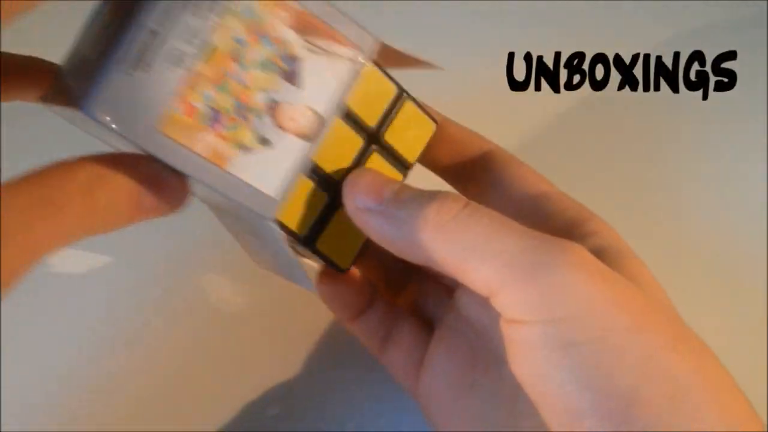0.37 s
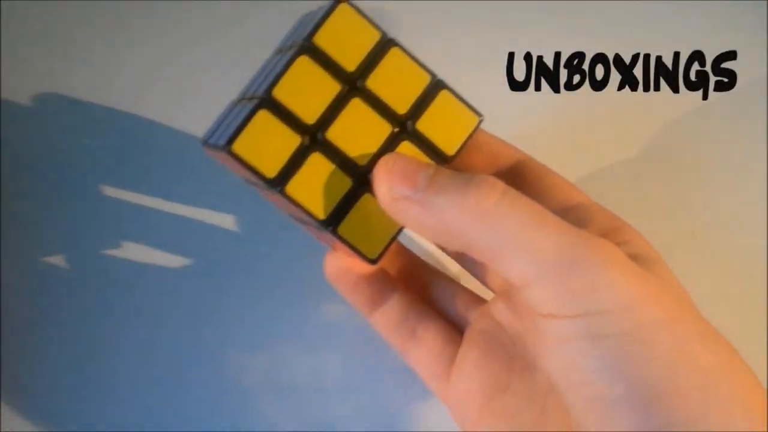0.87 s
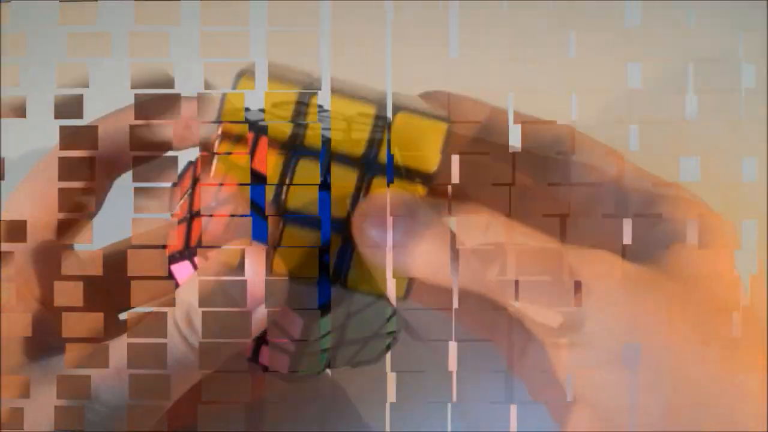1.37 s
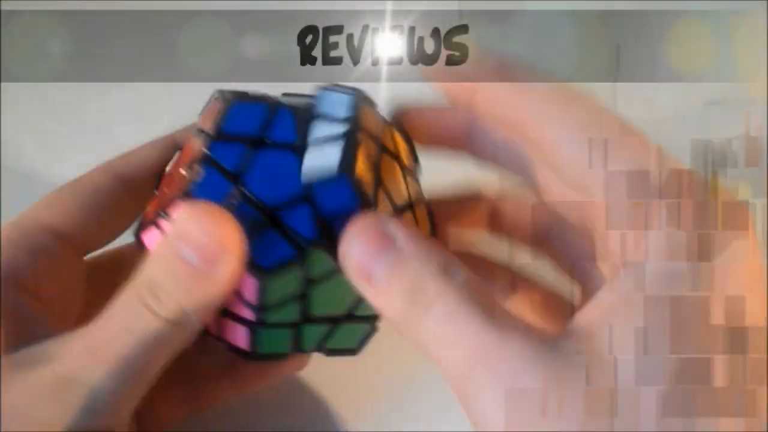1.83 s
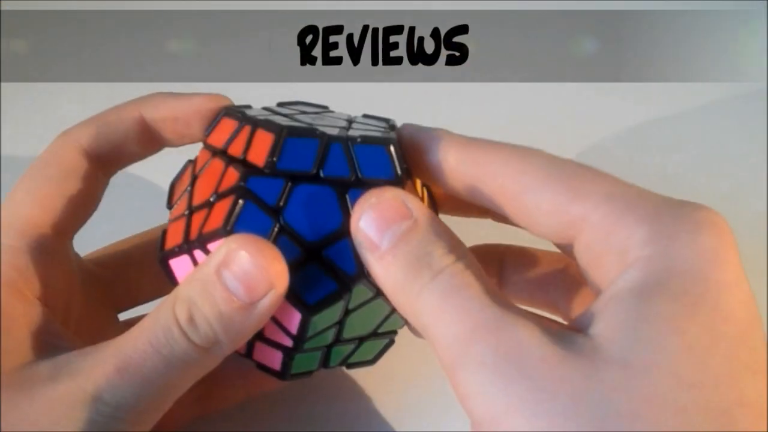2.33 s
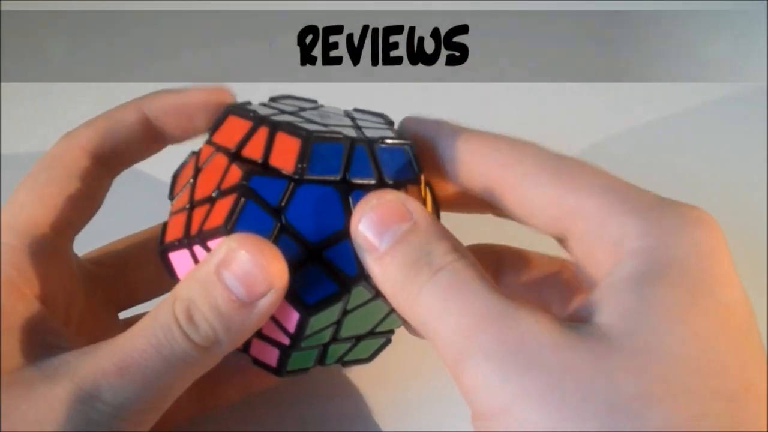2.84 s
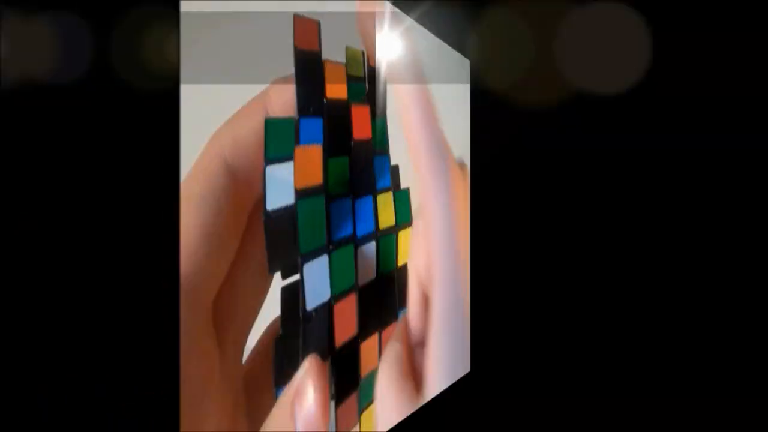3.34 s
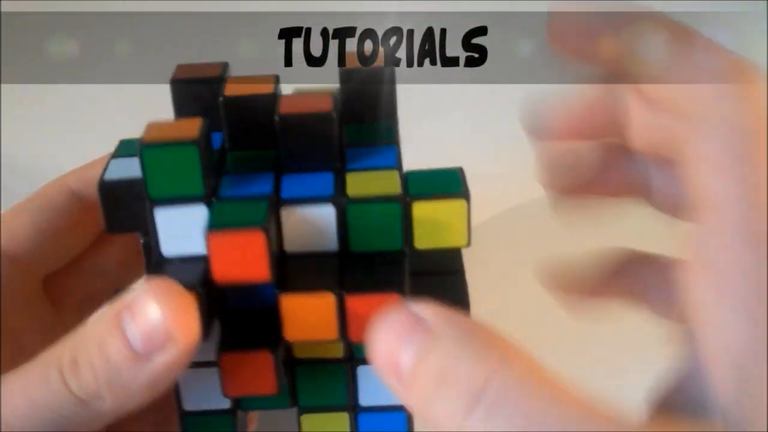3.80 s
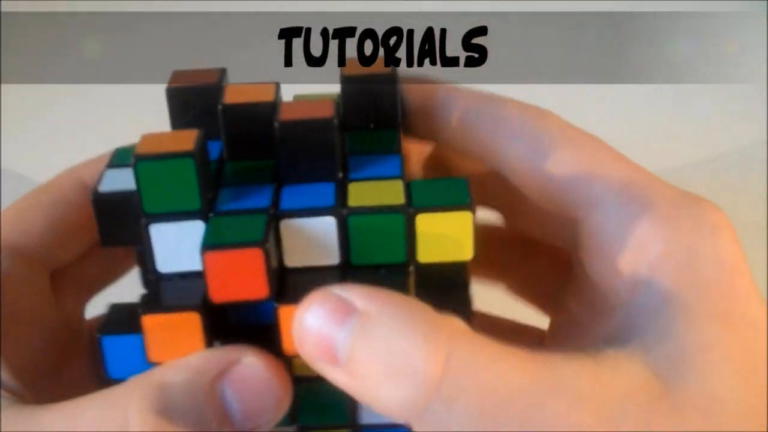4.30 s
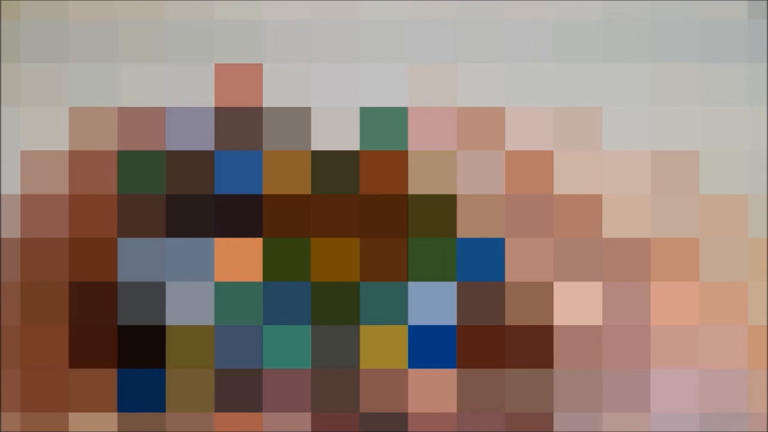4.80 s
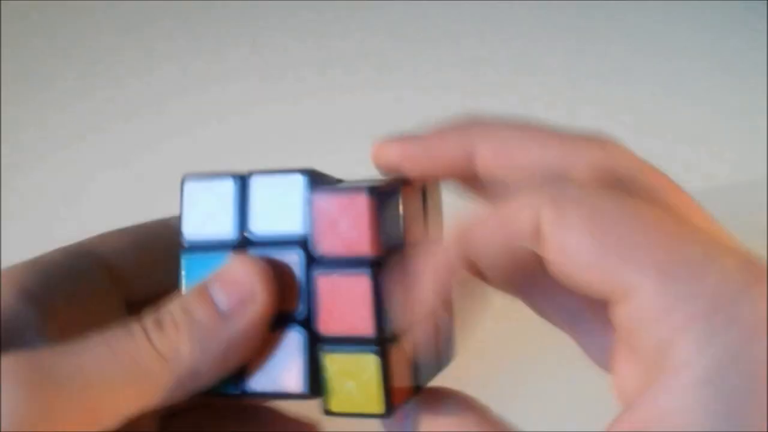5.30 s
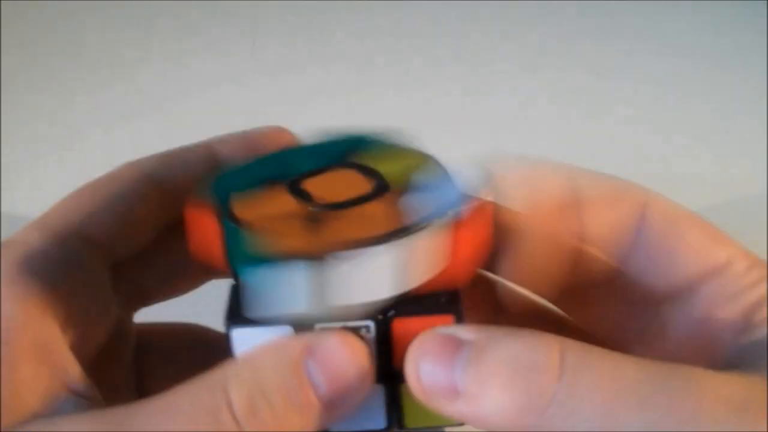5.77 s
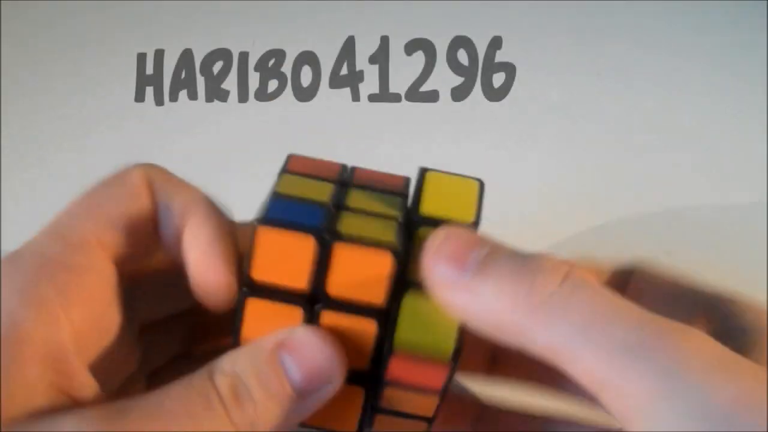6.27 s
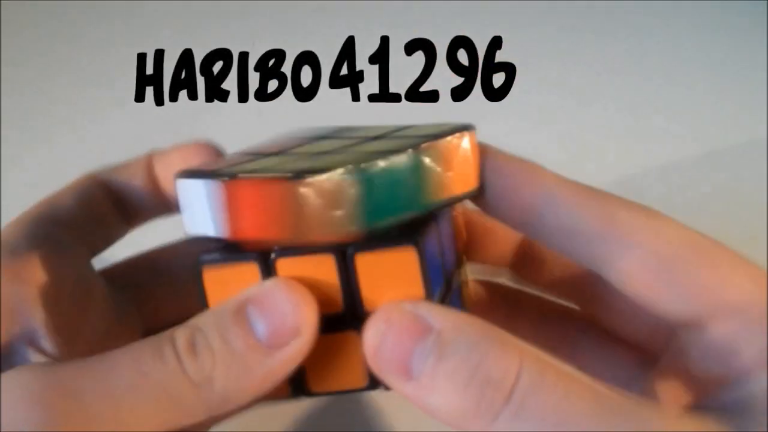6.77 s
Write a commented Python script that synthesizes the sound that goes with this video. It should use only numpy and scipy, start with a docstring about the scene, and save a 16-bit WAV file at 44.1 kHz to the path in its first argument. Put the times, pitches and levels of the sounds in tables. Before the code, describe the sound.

Close to the microphone, a hollow plastic twisting puzzle is worked quickly by hand. Short scraping swells, about eight a second, overlap into a continuous dry rustle full of tiny ticks. Sharp snaps jump out where edges catch, some bright, some knocking. Strokes briefly soften, then surge again. A small room answers faintly, with soft bumps and low microphone rumble below.

```python
"""Dense strokes of stick-slip ticks and fine scrape: a plastic twisting puzzle turned fast in two hands.
Pieces catch and snap on their edges; each blow or slip drives resonances of the hollow plastic.
The microphone is close, in a small room: a faint diffuse answer follows, and low thumps mark bumps.
A slow rumble shakes the microphone, and the loudest strokes drive it into soft clipping."""
import sys
import numpy as np
from scipy import signal
from scipy.fft import rfft, irfft, next_fast_len
from scipy.io import wavfile
from scipy.ndimage import map_coordinates

SR = 44100
rng = np.random.default_rng(int(sys.argv[2]) if len(sys.argv) > 2 else 0)


def store_wav(level_fs):
    """Save 16-bit WAV to argv[1]."""
    pcm = np.round(np.clip(np.atleast_2d(level_fs), -1, 1) * 32767)
    wavfile.write(sys.argv[1], SR, pcm.T.astype(np.int16))


def convert_level_to_amplitude(level_db):
    """Map a level in decibels to its linear amplitude factor."""
    exponent = np.asarray(level_db, float) / 20
    return 10 ** exponent


N = 314874


def unit(x):
    """Scaled to rms 1."""
    return x / np.sqrt(np.mean(x ** 2) + 1e-20)


def along(points, hz):
    """Interpolates (Hz, value) points on a log frequency axis."""
    point_hz, value = np.transpose(points)
    return np.interp(np.log(hz + 1), np.log(point_hz + 1), value)


def wobble(rate_hz):
    """Smooth random curve with rate_hz knots a second."""
    knots = rng.standard_normal(int(N * rate_hz / SR) + 4)
    return map_coordinates(knots, [np.arange(N) * rate_hz / SR])


def filtered(x, response):
    """Applies a complex response of frequency to x."""
    size = next_fast_len(N + 8192)
    spectrum = rfft(x, size) * response(np.fft.rfftfreq(size, 1 / SR))
    return irfft(spectrum, size)[..., :N]


def coloured(spectrum):
    """Noise of rms 1 with the given spectrum."""
    return unit(filtered(rng.standard_normal(N), lambda hz: convert_level_to_amplitude(along(spectrum, hz))))


def rung(modes, pushes, scatter_db):
    """Each push drives every mode at its own strength; the grip slowly damps or frees each mode."""
    out = np.zeros(N)
    for mode_hz, width_hz, level_db in modes:
        push_db = scatter_db * wobble(min(width_hz / 2, 300))
        grip_db = 1.34 * wobble(8)
        drive = pushes * convert_level_to_amplitude(level_db + push_db + grip_db)
        out += filtered(drive, lambda f: 1j * f * width_hz / (mode_hz ** 2 - f * f + 1j * f * width_hz))
    return out


# rumble spectrum, relative density: pitch_hz, level_db
RUMBLE_SPECTRUM = [(3, -26), (7, 3.5), (12, 0), (20, -16), (44, -20.5), (130, -37.5), (300, -64)]


def background():
    """Slow rumble at the microphone, its level unsteady."""
    level_db = -39.0 + 2.1 * wobble(3.39)
    return convert_level_to_amplitude(level_db) * coloured(RUMBLE_SPECTRUM)


# decay of the walls' answer: pitch_hz, t60_s
WALL_DECAY = [(300, 0.11), (2000, 0.4), (10000, 0.023)]


def room(x, block=8192):
    """Each frequency of the walls' answer dies at its own speed; the hands move, so the answer changes."""
    delay = 150  # samples
    out = np.zeros(N + block + SR)
    for start in range(0, N, block):
        hz, t_s, z = signal.stft(rng.standard_normal(SR // 3), SR, nperseg=256)
        decay = convert_level_to_amplitude(-60 * t_s / along(WALL_DECAY, hz)[:, None])
        tail = signal.istft(z * decay, SR, nperseg=256)[1]
        answer = signal.fftconvolve(x[start:start + block], tail / np.linalg.norm(tail))
        out[start + delay:][:len(answer)] += answer
    return out[:N]


# finger or piece bumps the whole puzzle, relative level: start_s, level_db
BUMPS = [(0.072, -40), (1.295, -36), (1.894, -38), (2.064, -46), (3.085, -48), (4.079, -41), (5.057, -43),
         (5.357, -41)]


def thumps():
    """One low push and a weaker rebound per bump, no ring."""
    out = np.zeros(N + SR)
    u = np.arange(SR // 10) / SR / 0.0019  # time in units of 1.9 ms
    push = u * (1 - u / 2) * np.exp(1 - u)
    for start_s, level_db in BUMPS:
        out[round(start_s * SR):][:len(u)] += convert_level_to_amplitude(level_db + 7.5) * push
    return out[:N]


# one face turn a row, relative levels; core and hollow are relative to the slide:
# middle_s, length_s, slide_db, core_db, hollow_db
FACE_TURNS = [(0.021, 0.1, -28.5, -7.5, -29), (0.116, 0.22, -26, -0.5, -14),
              (0.277, 0.19, -27, -8.5, -12.5), (0.376, 0.18, -30.5, -6.1, -21.7),
              (0.501, 0.14, -28.5, -6, -26), (0.621, 0.16, -26.5, -6, -13),
              (0.709, 0.19, -30.1, -10.5, -16.5), (0.864, 0.21, -38, -5, -12),
              (0.968, 0.17, -41.5, -11, -18), (1.131, 0.24, -25.5, -3.5, -20),
              (1.264, 0.17, -29, -6.5, -11), (1.378, 0.14, -26, -7.4, -13.5),
              (1.492, 0.192, -26.5, -7, -13.9), (1.607, 0.18, -32, -3.8, -15),
              (1.727, 0.21, -36, -8.5, -22.7), (1.888, 0.2, -26.5, -6.5, -12.5),
              (2.001, 0.21, -35.2, -8, -21), (2.122, 0.2, -28, 2.5, -17), (2.26, 0.221, -29.5, -9, -11.4),
              (2.369, 0.16, -29, -2.5, -26.5), (2.488, 0.16, -30, -9, -23), (2.603, 0.19, -26, -7, -16),
              (2.733, 0.159, -32.5, -10, -23), (2.862, 0.19, -39, -7.5, -11.5),
              (2.982, 0.27, -41, -7, -17.7), (3.122, 0.19, -23.5, -3.5, -14), (3.196, 0.1, -36, 4, -25),
              (3.243, 0.14, -28.5, -8, -15.5), (3.363, 0.16, -27.5, -8.5, -12),
              (3.475, 0.16, -25, -7.5, -13), (3.606, 0.25, -32.5, -2.5, -20), (3.737, 0.19, -38, -9, -24.0),
              (3.897, 0.23, -27.5, -8.5, -13.5), (3.999, 0.14, -28.0, -10, -26.4),
              (4.128, 0.2, -25, 2.5, -22), (4.253, 0.28, -31, -7, -16), (4.352, 0.27, -29, -7.5, -21.5),
              (4.493, 0.13, -28, -8.5, -35), (4.602, 0.169, -28.5, -3.5, -22),
              (4.693, 0.243, -28.6, -10.5, -13.5), (4.864, 0.19, -39, -5.5, -10),
              (4.968, 0.22, -40, -9.3, -20), (5.118, 0.21, -25.5, -4, -24), (5.207, 0.22, -34, -3, -12.0),
              (5.294, 0.19, -30.0, -9, -13), (5.392, 0.18, -27.5, -8, -13), (5.507, 0.22, -28.5, -9.1, -12),
              (5.627, 0.18, -31, -3.5, -15), (5.734, 0.18, -36.5, -6, -26), (5.898, 0.23, -27.5, -8, -12.9),
              (6.013, 0.14, -30, -6.5, -25), (6.119, 0.17, -24, 2, -26), (6.259, 0.21, -29, -9, -11),
              (6.362, 0.21, -27.5, -4, -18), (6.493, 0.19, -31, -6.5, -30), (6.628, 0.23, -26, -7, -12.5),
              (6.737, 0.19, -37.5, -6, -21), (6.892, 0.19, -38.8, -7.5, -12),
              (7.033, 0.29, -37.5, -0.9, -19), (7.116, 0.18, -23, -5, -15)]


def turning():
    """Each face speeds up and slows down in one swell; overlapping turns add and their colours blend."""
    rounding = 3.15  # how softly a turn starts and stops
    rest_db = -56  # rub of the grip between turns
    middle_s, length_s, slide_db, core_db, hollow_db = np.transpose(FACE_TURNS)[:, :, None]
    t_s = np.arange(0, N + 64, 64) / SR
    arch = np.clip(1 - (2 * (t_s - middle_s) / length_s) ** 2, 1e-4, 1)
    swell = convert_level_to_amplitude(slide_db) * arch ** rounding
    total = swell.sum(axis=0)
    blend = lambda db: (swell * db).sum(axis=0) / total
    curves = (total + convert_level_to_amplitude(rest_db), blend(core_db), blend(hollow_db))
    return [np.interp(np.arange(N) / SR, t_s, curve) for curve in curves]


def releases():
    """Each face clicks free once near mid-turn; rows have the columns of the catching edges."""
    middle_s, length_s, slide_db = np.transpose(FACE_TURNS)[:3]
    when, size, pitch = rng.random((len(FACE_TURNS), 3)).T
    start_s = np.clip(middle_s + length_s * (0.3 * when - 0.2), 0, None)
    level_db = slide_db + 1.5 + 2 * (2 * size - 1)
    pitch_hz = 4900 * np.exp(0.35 * (2 * pitch - 1))
    knock_db = np.full(len(start_s), -13.0)
    return list(zip(start_s, level_db, pitch_hz, knock_db))


# clearest edges catching, relative level; knock relative to it: start_s, level_db, pitch_hz, knock_db
CATCHES = [(0.0736, -20, 8750, -5), (0.0926, -15, 5500, 1), (0.38, -20, 5950, -30),
           (0.4657, -26, 4750, -24), (0.5891, -23, 5290, -5), (0.7798, -24, 5170, -27),
           (0.836, -23.5, 4570, -7), (0.857, -24, 6030, -21), (0.881, -28, 4000, -10),
           (0.947, -23.5, 3620, -20), (0.967, -20, 5800, -20), (0.987, -25, 4690, -7),
           (1.0108, -25, 5200, -18), (1.0431, -16.5, 8060, -3.5), (1.0763, -28, 5230, -15),
           (1.2563, -22, 5500, -7), (1.296, -18, 7900, -11), (1.5845, -27, 6080, -18),
           (1.606, -27, 5070, -10), (1.692, -30.5, 3060, -3), (1.71, -25, 4770, -16),
           (1.797, -32, 5220, -2), (1.827, -26, 5100, -25), (1.965, -24.5, 4500, -11),
           (2.057, -28, 3000, -5), (2.0666, -15, 4900, -10), (2.084, -24, 5000, -7),
           (2.1116, -19, 5900, -3), (2.124, -28, 5500, -6), (2.143, -22, 4460, -7), (2.179, -29, 6000, -5),
           (2.2031, -26, 3330, -1), (2.6745, -29, 5500, -21), (2.7067, -21, 3500, -26),
           (2.77, -27, 5000, -15), (2.8297, -22.5, 3560, -19), (2.853, -23.5, 5350, -8),
           (2.876, -28, 5000, -14), (2.964, -26, 4640, -1), (2.9856, -20, 5600, -26),
           (3.0108, -27, 3380, -8), (3.037, -28.5, 5710, -15), (3.0859, -14, 5340, 1.5),
           (3.3477, -16, 3300, -31), (3.545, -23, 5860, -21), (3.5948, -30, 4580, -6),
           (3.709, -27.5, 4200, -12), (3.733, -26, 4500, -8), (3.76, -30, 3630, 0), (3.8357, -31, 4380, 2),
           (3.8579, -15, 5700, -13), (4.058, -33, 3340, -5), (4.0774, -13, 5510, -10),
           (4.4493, -23, 3330, -12), (4.752, -27, 5000, -9), (4.831, -24, 3300, -11),
           (4.8542, -25, 5710, -25), (4.877, -27, 3500, -13), (4.95, -23, 5210, -25),
           (4.9723, -23.5, 5430, -17), (4.996, -22.5, 5160, -10), (5.026, -27, 5740, -12),
           (5.0692, -20, 8100, -8), (5.0879, -18, 2920, -1), (5.359, -19, 7940, -18),
           (5.71, -20.5, 4420, -20), (5.7415, -22, 5940, -21), (5.7698, -25, 4820, -14),
           (5.8517, -29.5, 5600, 4), (5.9865, -18, 6000, -24), (6.082, -11, 6350, -7),
           (6.4328, -22.5, 4400, -26), (6.4951, -23, 5500, -9), (6.757, -24.5, 4960, -13),
           (6.8394, -24.5, 3580, -29), (6.864, -27, 5960, -21), (6.8917, -27.5, 4600, -3.5),
           (6.978, -23, 3480, -21), (7.002, -17, 5500, -21), (7.024, -34, 3320, -4), (7.054, -19, 4500, -2)]
# resonances of the core, relative level: pitch_hz, width_hz, level_db
CORE_MODES = [(1246, 116, -5.5), (1414, 310, 0), (1976, 970, -0.2)]
# resonances of the shell, low to high, relative level: pitch_hz, width_hz, level_db
SHELL_MODES = [(3230, 680, 3), (4574, 1300, 7), (5500, 590, 1.5), (7830, 1030, -6), (11250, 1280, -9.5),
               (15700, 3600, -19.5)]


def snaps():
    """An edge jumps its neighbour and bounces once 2.5-5 ms later; the struck piece rings at its pitch."""
    t_s = np.arange(SR // 40) / SR
    rise = lambda t: 1 - np.exp(-np.abs(t) / 0.0001)
    blow = lambda t: np.where(t > 0, rise(t) * np.exp(-(t / 0.0019) ** 2), 0)
    bright, dull, ring = np.zeros((3, N + len(t_s)))
    for start_s, level_db, pitch_hz, knock_db in CATCHES + releases():
        first = round(start_s * SR)
        at = slice(first, first + len(t_s))
        wait, strength = rng.random(2)
        bounce = 0.77 * strength * blow(t_s - 0.0025 - 0.0025 * wait)
        chatter = rng.standard_normal(len(t_s)) * convert_level_to_amplitude(level_db) * (blow(t_s) + bounce)
        bright[at] += chatter
        dull[at] += chatter * convert_level_to_amplitude(knock_db)
        piece = np.exp(-np.pi * 500 * t_s) * np.sin(2 * np.pi * pitch_hz * t_s)  # 500 Hz wide
        ring[at] += unit(np.convolve(chatter, piece)[:len(t_s)]) * np.std(chatter)
    scatter_db = 3
    shell = convert_level_to_amplitude(-5) * rung(SHELL_MODES[:-3], bright[:N], scatter_db)
    shell += convert_level_to_amplitude(8.5) * rung(SHELL_MODES[-3:], bright[:N], scatter_db)
    knock = convert_level_to_amplitude(9.5) * rung(CORE_MODES, dull[:N], scatter_db)
    return shell + knock + convert_level_to_amplitude(-5.5) * ring[:N]


def clumps(per_second, life_s, spread_db):
    """Sudden bursts of uneven size, each dying exponentially."""
    starts = (rng.random(N) < per_second / SR) * convert_level_to_amplitude(spread_db * rng.standard_normal(N))
    return signal.fftconvolve(starts, np.exp(-np.arange(SR // 20) / SR / life_s))[:N]


# resonances of the hollow pieces, relative level: pitch_hz, width_hz, level_db
HOLLOW_MODES = [(518, 45, -4), (648, 240, 7), (174, 550, -10)]
# resonance of the centre piece, relative level: pitch_hz, width_hz, level_db
HUB_MODES = [(1034, 110, 0)]


def sliding():
    """Faces slip and stick: ticks of very uneven size over a fine scrape; fast strokes run denser."""
    slide, core_db, hollow_db = turning()
    speed = np.clip(slide / convert_level_to_amplitude(-28), 0, 1)
    # low modes stand out as a face slows
    core_db = core_db + 4.5 * (1 - speed)
    hollow_db = hollow_db + 1 * (1 - speed)

    chance, size, scrape = rng.random(N), rng.exponential(size=N), rng.standard_normal(N)
    per_second = 1200 * convert_level_to_amplitude(12 * speed)
    tick_size = convert_level_to_amplitude(3.48 * np.minimum(size, 5)) / np.sqrt(per_second)
    ticks = (chance < per_second / SR) * np.sign(scrape) * tick_size
    # loose pieces rattle most in strokes that load the core
    loose = 0.64 * convert_level_to_amplitude(1.15 * core_db + 11.5)
    rattle = (3.5 + loose * unit(clumps(per_second=110, life_s=0.0021, spread_db=3.5))) / (1 + loose)
    slips = unit(unit(ticks) + 0.83 * scrape) * rattle

    shell = convert_level_to_amplitude(-4.0) * unit(rung(SHELL_MODES[:-3], slips, scatter_db=3.5))
    # slow rubbing is dull: the highest modes need speed
    shell += convert_level_to_amplitude(-12.0) * speed ** 0.38 * unit(rung(SHELL_MODES[-3:], slips, scatter_db=5.5))
    core = convert_level_to_amplitude(core_db - 1.0) * unit(rung(CORE_MODES, slips, scatter_db=3.5))
    # the hub sings in hard, fast turns
    hub_gain = convert_level_to_amplitude(2 * np.minimum(core_db, -2.5) - 8.5) * speed
    hub = hub_gain * unit(rung(HUB_MODES, slips, scatter_db=8.5))
    hollow = convert_level_to_amplitude(hollow_db - 1.0) * unit(rung(HOLLOW_MODES, slips, scatter_db=-1.5))
    # thin corners flick past each other: brief, very bright
    flicks = clumps(per_second=60, life_s=0.00053, spread_db=4.5) * rng.standard_normal(N)
    corners = convert_level_to_amplitude(-14) * unit(rung(SHELL_MODES[-3:], flicks, scatter_db=3.5))
    return slide * (shell + core + hub + hollow + corners)


def scene():
    """Puzzle, its answer from the walls, thumps and rumble."""
    puzzle = sliding() + snaps()
    return (puzzle + convert_level_to_amplitude(-17.0) * room(puzzle) + thumps() + background())[None]


def low_pass(x):
    """Removes everything above the highest recorded frequency."""
    return signal.sosfilt(signal.butter(12, 16330, fs=SR, output="sos"), x)


def record(dry):
    """Loud strokes flatten softly; the top of the band is cut."""
    ceiling, hardness = 0.09, 3.5
    edge = [(14950, 0), (15250, -38), (16300, -70)]  # pitch_hz, level_db
    clipped = dry / (1 + np.abs(dry / ceiling) ** hardness) ** (1 / hardness)
    mix = filtered(clipped, lambda hz: convert_level_to_amplitude(along(edge, hz)))
    return low_pass(mix)


dry = scene()
out = record(dry)
store_wav(out)
```